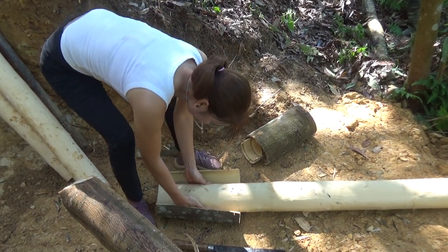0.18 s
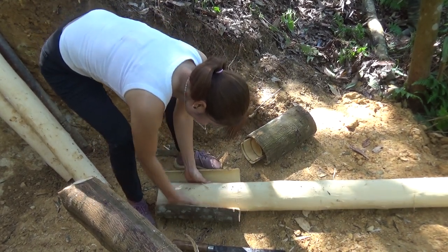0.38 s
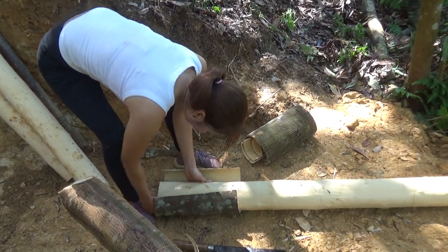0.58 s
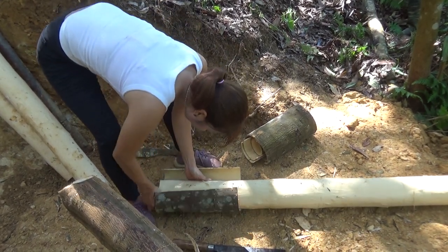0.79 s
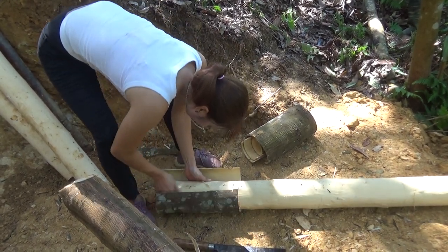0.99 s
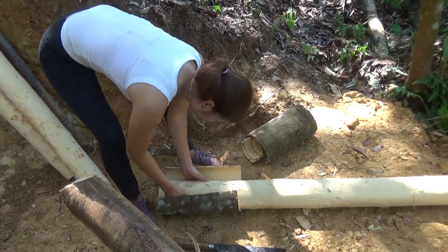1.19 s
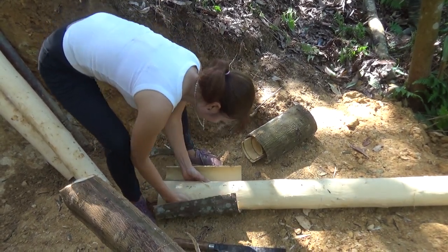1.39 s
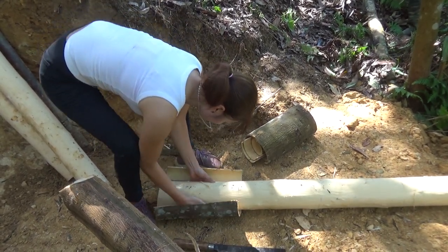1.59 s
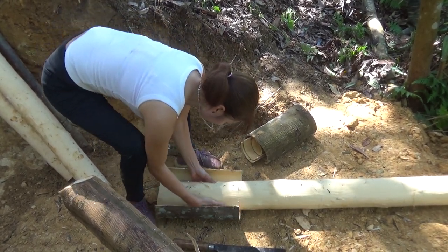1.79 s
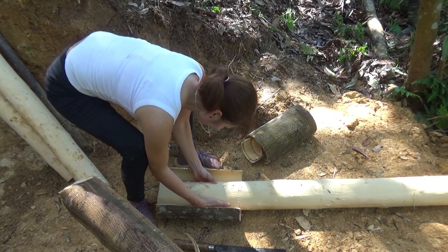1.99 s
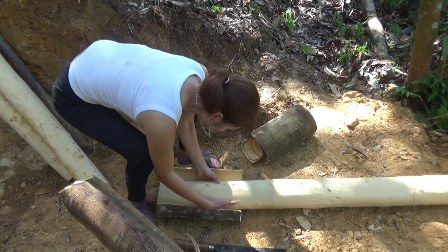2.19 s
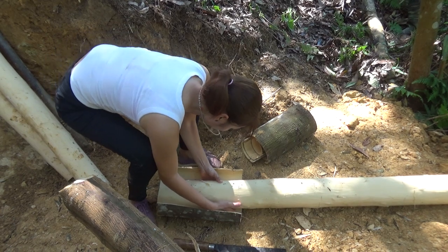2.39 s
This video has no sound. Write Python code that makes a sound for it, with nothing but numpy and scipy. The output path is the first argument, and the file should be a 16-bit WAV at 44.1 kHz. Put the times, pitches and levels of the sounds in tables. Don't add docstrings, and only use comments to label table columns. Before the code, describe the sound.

Dry, bright rasping as bark is pried from a log, one loud rip, then crackling snaps

```python
import sys
import numpy as np
from scipy import signal
from scipy.fft import rfft, irfft, next_fast_len
from scipy.io import wavfile
from scipy.ndimage import uniform_filter1d, minimum_filter1d, map_coordinates

SR = 44100
rng = np.random.default_rng(int(sys.argv[2]) if len(sys.argv) > 2 else 0)


def volts_from_db(level):
    exponent = np.asarray(level, float) / 20
    return 10 ** exponent


def pcm_store(signal):
    levels = np.round(np.clip(np.atleast_2d(signal), -1, 1) * 32767)
    wavfile.write(sys.argv[1], SR, levels.astype(np.int16).T)


N = 105840

# [f/Hz, level/dB per Hz]
FOREST_COLOUR = [(350, -62), (600, -2), (1090, -3), (1560, -7), (1880, -6), (4430, -13.5), (7640, -4.5),
                 (9370, -11.5), (15500, -15.5)]
RUMBLE_COLOUR = [(15, -65), (25, -19), (53, -13), (86, -4), (161, -2.5), (293, -5.5), (518, -8), (600, -23),
                 (780, -47), (1320, -120)]
FOREST_DB, HISS_PATCH_DB, RUMBLE_DB = -57, 1, -60
# [f/Hz, coherence/1]
COHERENCE = [(60, 1), (300, 0.93), (1000, 0.95), (3000, 0.95), (6000, 0.93), (7700, 0.95), (9500, .97)]
# [t/s, duration/s, f/Hz, bandwidth/Hz, level/dB]
INSECTS = [
    (-.1, 2.6, 7670, 240, -64.5),
    (0.495, 0.22, 7250, 450, -64.5),
    (.68, .15, 7200, 300, -65.5),
    (0.757, 0.079, 6000, 500, -63.5),
    (0.93, 0.088, 6140, 700, -68),
    (.75, .12, 8000, 400, -73),
    (.9, .2, 8300, 500, -72),
]
INSECT_FADE_S, INSECT_PULSE_DB = 0.021, 2.7
# [t/s, duration/s, start f/Hz, end f/Hz, level/dB]
BIRD_NOTE = (.805, .09, 3550, 3300, -68)

# [t/s, duration/s, f/Hz, bandwidth/Hz, level/dB]
SHELL_HUMS = [(0.114, .1, 1880, 250, -56), (0.177, 0.057, 1056, 130, -51), (.26, 0.087, 1900, 220, -51.5),
              (0.39, 0.028, 1060, 90, -52), (.414, 0.014, 1103, 80, -38.5), (0.43, .032, 1150, 150, -40),
              (0.498, 0.034, 1115, 100, -55), (0.511, .075, 2030, 200, -55), (0.48, 0.09, 2700, 600, -63.5),
              (1.435, 0.038, 1950, 250, -50.5), (1.501, 0.093, 2240, 1200, -53),
              (2.068, 0.064, 2610, 220, -60), (2.11, 0.033, 1205, 120, -53.5),
              (2.159, 0.029, 1215, 110, -56), (2.203, 0.04, 1223, 90, -52.5),
              (1.198, 0.081, 2700, 250, -58), (2.356, 0.044, 1800, 121, -56), (.56, .34, 330, 220, -64)]
HUM_FADE = 0.42
# [t/s, crack level/dB, crack f/Hz, knock level/dB, knock f/Hz]
SNAPS = [(0.4262, -6, 7400, -35, 1060), (.468, -50, 7500, -37, 1150), (0.45, -40, 7000, -46, 110),
         (.990, -36.5, 10000, -54, 890), (1.106, -63, 8000, -46, 700), (1.231, -27, 12000, -50, 2300),
         (1.2105, -43, 9000, -43, 1000), (1.2432, -25, 9600, -38, 820), (1.2585, -43, 9000, -42.5, 805),
         (1.264, -32, 9000, -38, 1120), (1.298, -50, 9000, -49, 1900), (1.3358, -22, 13100, -33, 834),
         (1.351, -45, 9000, -43, 2700), (1.4832, -34, 7000, -28.5, 1150), (1.4852, -36, 9000, -33, 2700),
         (1.4938, -15.5, 7740, -24, 2740), (1.506, -40, 8000, -40, 800), (1.517, -40, 6960, -41.5, 710),
         (1.863, -36, 9900, -69, 900), (1.8805, -48, 9000, -41, 880), (2.383, -55, 8950, -32, 3080),
         (.4455, -10, 6900, -33, 2020), (0.4483, -7.5, 7000, -36, 2160), (0.4514, -11, 6860, -39, 607),
         (.4115, -33, 9000, -53, 1900), (2.1245, -19, 8200, -46, 1200), (2.1305, -29, 7000, -68, 600),
         (2.137, -27, 7840, -48, 600), (2.159, -47, 7500, -38, 1650), (2.356, -50, 8000, -39, 2000),
         (.0135, -25, 6900, -60, 1000), (.0255, -29, 9000, -60, 1000), (.04, -29, 9000, -60, 1000)]
CRACK_T60, CRACK_RING_T60, CRACK_NOISE = 0.0057, 0.005, 0.91
KNOCK_CYCLES, KNOCK_T60_MAX, KNOCK_DAMPED = 8.9, 0.032, 1.7
KNOCK_UPPER, UPPER_DB, KNOCK_CLICK_DB = 1.376, -8, -14.5
# [f/Hz, level/dB, T60/s]
STRIP_MODES = [(110, -36, 0.011), (280, -22, 0.012), (640, -17.5, 0.028), (850, -17.5, 0.029),
               (1170, -20.5, 0.021), (7280, -9, 0.0055), (7720, -12.5, 0.019), (10700, -9, 0.0022),
               (12000, 0.5, 0.0052), (12800, 0.5, .0025), (14000, -4, 0.0034), (16000, -20, 0.0015)]
BREAK_S, BREAK_DB = 1.4923, -7.3

# [t/s, rasp level/dB, shell level re rasp/dB]
PUSH_FIRST = [
    (0, -42, -16),
    (.045, -40.5, -17.5),
    (.105, -48, -18),
    (.14, -43.5, -9),
    (.22, -35, -12),
    (.31, -41, -15.5),
    (.36, -45, -9),
    (.48, -43.5, -8),
    (.66, -65, 3.5),
]
PUSH_SECOND = [
    (1.11, -73, 11),
    (1.126, -60, -8),
    (1.148, -51.5, -1.5),
    (1.186, -50.5, -3.5),
    (1.244, -41.5, -5),
    (1.25, -47, -5.5),
    (1.268, -43, -6.5),
    (1.304, -54, -5.5),
    (1.325, -44.5, -9),
]
PUSH_SECOND_ON = [
    (1.325, -44, -3),
    (1.34, -44, -8),
    (1.41, -46, -6.5),
    (1.43, -41, -7.5),
    (1.478, -34.5, -9),
    (1.5, -35.5, -9),
    (1.54, -40.5, -8),
    (1.6, -41, -13.5),
]
PUSH_THIRD = [
    (1.6, -43.5, -13),
    (1.68, -45, -9),
    (1.71, -39.5, -12.5),
    (1.8, -44, -16),
    (1.835, -47, -11.5),
    (1.85, -54, -19),
]
PUSH_FOURTH = [
    (1.85, -50.5, -16),
    (1.9, -47.5, -12),
    (1.98, -39.5, -11.5),
    (2.02, -44.5, -13.5),
    (2.1, -40.5, -10.5),
    (2.16, -41.5, -11.5),
    (2.22, -41, -14.5),
    (2.27, -43.5, -15.5),
    (2.4, -43, -11),
]
PUSH_SURGE = [
    (2.1, -48, -25),
    (2.108, -34, -18),
    (2.123, -32.5, -18),
    (2.129, -37, -19),
    (2.138, -33, -26),
    (2.15, -45, -18),
]
RIP_EFFORT = [
    (.365, -42, -12),
    (.41, -35, -10),
    (.4252, -27, -12),
    (.4268, -19.5, -17),
    (.431, -24.5, -15),
    (.443, -23, -15),
    (.4455, -19.5, -17),
    (.4535, -19.5, -18),
    (.4555, -32, -8),
]
RIP_T60, RIP_SIDE_DB = 0.056, -27
# [f/Hz, level/dB per Hz]
RASP_FIRST = [(1760, -65), (3000, -32), (4720, -12.5), (5840, -3.5), (8010, 0.5), (9580, -2), (11500, 0.5),
              (15500, -9.5)]
RASP_SECOND = [(1760, -38), (3000, -10), (3370, -14.5), (4660, -11), (5200, -6), (8580, 0), (13900, -5.5),
               (15500, -10)]
RASP_THIRD = [(1760, -41), (3000, -12.5), (4920, -7.5), (6700, 0.5), (7130, -2.5), (9520, -2.5),
              (13300, -6), (15500, -12)]
RASP_FOURTH = [(1760, -32), (3000, -15.5), (4230, -12.5), (4750, -7.5), (5840, -5), (7690, -1),
               (12000, -6.5), (15500, -12)]
RASP_SURGE = [(1760, -40), (3000, -28), (4500, -20), (6010, -11), (7480, -2), (8500, -2), (11900, -5.5),
              (15500, -11)]
RASP_RIP = [(1760, -25.5), (3000, -16), (4230, -22), (6010, -6), (7480, -5.5), (8070, -4), (11900, -4.5),
            (15500, -16)]
# [f/Hz, bandwidth/Hz, level/dB]
SHELL_FIRST = [(620, 550, -9.5), (1106, 330, -2.5), (1880, 160, -3.5), (2100, 180, -2), (2770, 1300, -10)]
SHELL_SECOND = [(604, 260, -2.5), (1150, 690, -1.5), (1900, 400, 0), (2760, 390, -0.5)]
SHELL_FOURTH = [(600, 140, -4), (1253, 160, 1), (1860, 960, -5), (2600, 560, 0.5)]
SHELL_RIP = [(313, 160, -14), (605, 300, -6), (1110, 68, 0.5), (1300, 136, -7.5), (1850, 240, -5.5),
             (2280, 230, -3.5)]
FIBRES_PER_S, FIBRE_SPREAD_DB = 25000, 1
CLUMP_DB, FLUTTER_DB, PATCH_DB = -0.17, 1.04, 1.5

TREES_DB, TREES_T60 = -42, 0.038
GROUND_DB, GROUND_T60 = -32, 0.01
LEAN_DB = 0.36


def unit(x):
    return x / np.sqrt(np.mean(x ** 2) + 1e-20)


def along(points, hz):
    f, value = np.transpose(points)
    return np.interp(np.log(hz + 1), np.log(f + 1), value)


def wobble(rate):
    knots = rng.standard_normal(N // 20)
    return map_coordinates(knots, [np.arange(N) * rate / SR])


def filtered(x, response):
    m = next_fast_len(N + SR // 2)
    hz = np.fft.rfftfreq(m, 1 / SR)
    return irfft(rfft(x, m) * response(hz), m)[..., :N]


def resonant(peaks):
    def response(f):
        total = 0
        for k, (centre, width, db) in enumerate(peaks):
            mode = 1j * f * width / (centre * centre - f * f + 1j * f * width)
            total = total + (-1) ** k * volts_from_db(db) * mode
        return total
    return response


def patchy(x, depth_db):
    z = signal.stft(x, nperseg=256)[2]
    field = uniform_filter1d(rng.standard_normal(z.shape[-2:]), size=5, axis=0)
    field = uniform_filter1d(field, size=6, axis=1)
    return signal.istft(z * volts_from_db(depth_db * unit(field)), nperseg=256)[1][..., :N]


def spread(gain):
    def mid_side_gain(hz):
        angle = np.arccos(np.clip(along(COHERENCE, hz), -1, 1)) / 2
        return gain(hz) * [np.cos(angle), np.sin(angle)]
    mid, side = filtered(rng.standard_normal((2, N)), mid_side_gain)
    return unit(np.array([mid + side, mid - side]))


def forest():
    hiss = patchy(spread(lambda hz: volts_from_db(along(FOREST_COLOUR, hz))), HISS_PATCH_DB)
    rumble = spread(lambda hz: volts_from_db(along(RUMBLE_COLOUR, hz)))
    return volts_from_db(FOREST_DB + 0.19 * wobble(8.5)) * hiss + volts_from_db(RUMBLE_DB + 0.09 * wobble(4.0)) * rumble


def insects():
    t, out = np.arange(N) / SR, 0
    for s, length, hz, width_hz, db in INSECTS:
        gate = np.clip(np.minimum(t - s, s + length - t) / INSECT_FADE_S, 0, 1)
        mode = resonant([(hz, width_hz, 0)])
        band = spread(lambda f: abs(mode(f)) ** 2)
        out = out + gate * volts_from_db(db + INSECT_PULSE_DB * wobble(39.7)) * band
    return out


def bird():
    s, length, from_hz, to_hz, db = BIRD_NOTE
    u = np.clip((np.arange(N) / SR - s) / length, 0, 1)
    pitch = from_hz + (to_hz - from_hz) * np.sqrt(u) + 25 * wobble(99)
    note = np.sin(2 * np.pi * np.cumsum(pitch) / SR)
    swell = np.sqrt(np.sin(np.pi * u) ** 2)
    return volts_from_db(db + 2.5 * wobble(69.6)) * swell * note


def hums():
    t, out = np.arange(N) / SR, 0
    for s, length, hz, width_hz, db in SHELL_HUMS:
        gate = np.clip(np.minimum(t - s, s + length - t) / (HUM_FADE * length), 0, 1)
        mode = resonant([(hz, width_hz, 0)])
        hum = filtered(rng.standard_normal(N), lambda f: mode(f) ** 2)
        out = out + gate * volts_from_db(db) * unit(hum)
    return out


def snap_crack(t, hz):
    hiss = rng.standard_normal(len(t)) * volts_from_db(-60 * t / CRACK_T60)
    return CRACK_NOISE * hiss + np.sin(2 * np.pi * hz * t) * volts_from_db(-60 * t / CRACK_RING_T60)


def snap_knock(t, hz):
    knock = np.sin(2 * np.pi * hz * t)
    knock = knock + volts_from_db(UPPER_DB) * np.sin(2 * np.pi * KNOCK_UPPER * hz * t)
    knock = knock + volts_from_db(KNOCK_CLICK_DB - 60 * t / 0.011) * np.sin(2 * np.pi * 3.47 * hz * t)
    t60 = min(KNOCK_CYCLES / hz, KNOCK_T60_MAX)
    onset = 1 - np.exp(-t / 0.00055)
    return knock * volts_from_db(-60 * (t / t60) ** KNOCK_DAMPED) * onset


def snaps():
    cracks, knocks = np.zeros(N + SR), np.zeros(N + SR)
    t = np.arange(SR // 10) / SR
    for s, crack_db, crack_hz, knock_db, knock_hz in SNAPS:
        start = round(s * SR)
        cracks[start:][:len(t)] += volts_from_db(crack_db) * snap_crack(t, crack_hz)
        knocks[start:][:len(t)] += volts_from_db(knock_db) * snap_knock(t, knock_hz)
    return filtered(cracks[:N], lambda hz: volts_from_db(along(RASP_RIP, hz))) + knocks[:N]


def strip_break():
    out, t = np.zeros(N), np.arange(SR // 10) / SR
    ring = 0
    for hz, db, t60 in STRIP_MODES:
        onset = np.tanh(np.pi * hz * t)
        ring = ring + volts_from_db(db - 60 * t / t60) * np.sin(2 * np.pi * hz * t) * onset
    out[round(BREAK_S * SR):][:len(t)] = volts_from_db(BREAK_DB) * ring * (1 - np.exp(-t * SR / 3))
    return out


def push(rows, rasp, shell):
    s, rasp_db, shell_db = np.transpose(rows)
    t, draw = np.arange(N) / SR, rng.random((2, N))
    breaks = (draw[0] < FIBRES_PER_S / SR) * rng.standard_normal(N)
    breaks = breaks * volts_from_db(-FIBRE_SPREAD_DB * np.log(draw[1] + 1e-4))
    clumps = volts_from_db(CLUMP_DB * wobble(60) + FLUTTER_DB * wobble(300))
    fibres = patchy(breaks * clumps, PATCH_DB)
    bright = unit(filtered(fibres, lambda hz: volts_from_db(along(rasp, hz))))
    hollow = unit(filtered(fibres, resonant(shell)))
    edge = np.clip(np.minimum(t - s[0] + 0.012, s[-1] + 0.015 - t) / 0.027, 0, 1)
    effort = edge * volts_from_db(np.interp(t, s, rasp_db))
    return effort * (bright + volts_from_db(np.interp(t, s, shell_db)) * hollow)


def tearing():
    t = np.arange(N) / SR
    before, after = RIP_EFFORT[0][0] + 0.03 - t, t - RIP_EFFORT[-1][0] + 0.009
    around_rip = np.clip(np.maximum(before, after) / 0.033, 0, 1)
    out = around_rip * push(PUSH_FIRST, RASP_FIRST, SHELL_FIRST)
    out = out + push(PUSH_SECOND, RASP_SECOND, SHELL_SECOND)
    out = out + push(PUSH_SECOND_ON, RASP_SECOND, SHELL_SECOND)
    out = out + push(PUSH_THIRD, RASP_THIRD, SHELL_SECOND)
    out = out + push(PUSH_FOURTH, RASP_FOURTH, SHELL_FOURTH)
    return out + push(PUSH_SURGE, RASP_SURGE, SHELL_FOURTH)


def rip():
    s, db, shell_db = RIP_EFFORT[-1]
    rows = RIP_EFFORT + [(s + RIP_T60 / 2, db - 20, shell_db)]
    near = push(rows, RASP_RIP, SHELL_RIP)
    far = push(rows, RASP_RIP, SHELL_RIP)
    return near + volts_from_db(RIP_SIDE_DB) * far * np.array([[1], [-1]])


def scattered(x, t60):
    t = np.arange(SR // 4) / SR
    tail = rng.standard_normal((2, len(t))) * volts_from_db(-60 * t / t60)
    return signal.fftconvolve(x[None], tail / np.linalg.norm(tail[0]), axes=1)[:, :N]


def scene():
    bark = tearing() + snaps() + strip_break() + hums() + bird()
    echoes = volts_from_db(TREES_DB) * scattered(bark, TREES_T60) + volts_from_db(GROUND_DB) * scattered(bark, GROUND_T60)
    return (bark + rip()) * volts_from_db([[LEAN_DB], [-LEAN_DB]]) + echoes + forest() + insects()


def top_cut(x):
    return signal.sosfilt(signal.butter(12, 16680, fs=SR, output="sos"), x)


def record(dry):
    top_hz, crack_top_hz, sharp_peak = 15760, 16680, 0.52
    body = filtered(dry, lambda hz: hz < top_hz)
    top = filtered(dry, lambda hz: (hz >= top_hz) & (hz < crack_top_hz))
    peaks = -1. * (abs(dry[0]) > sharp_peak)
    sharp = uniform_filter1d(-minimum_filter1d(peaks, size=256), size=128)
    return top_cut(body + sharp * top)


dry = scene()
out = record(dry)
pcm_store(out)
```